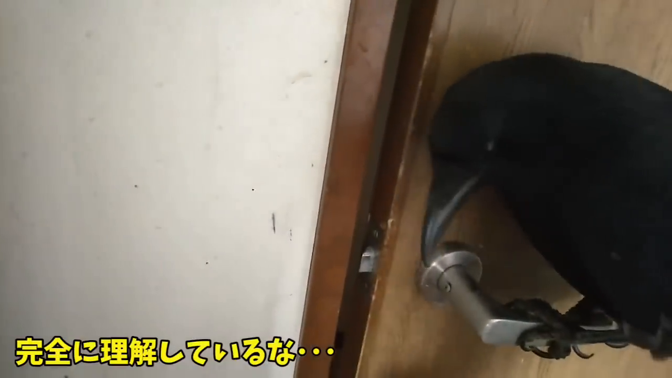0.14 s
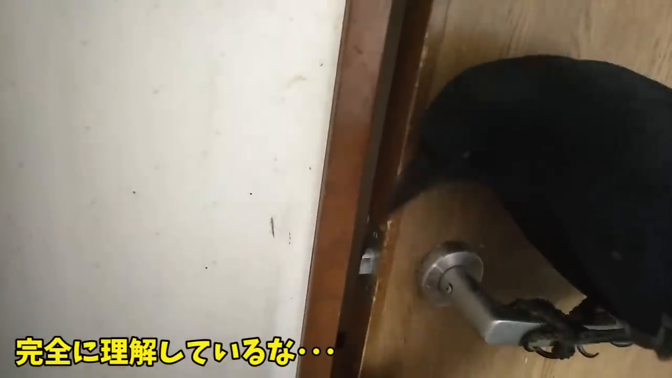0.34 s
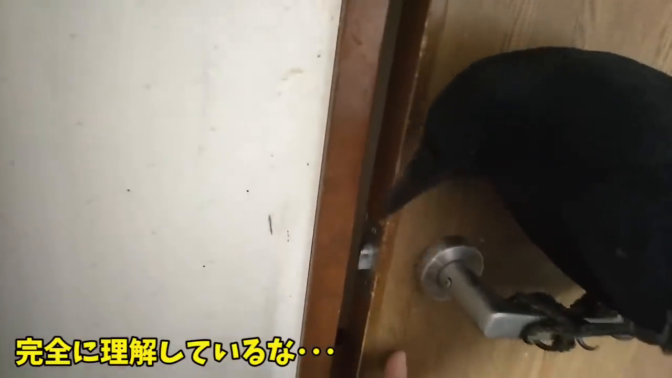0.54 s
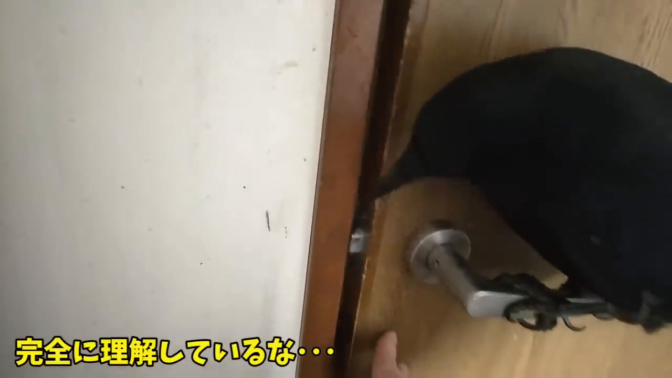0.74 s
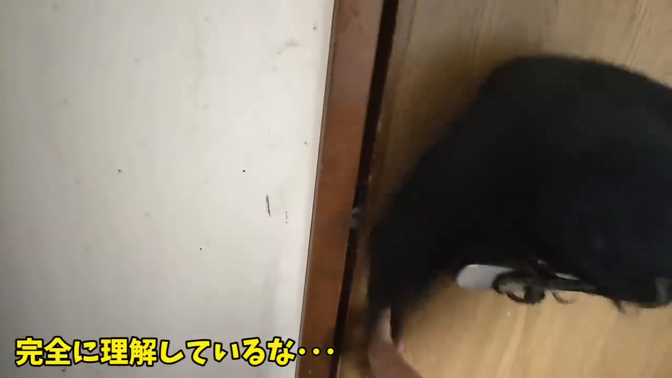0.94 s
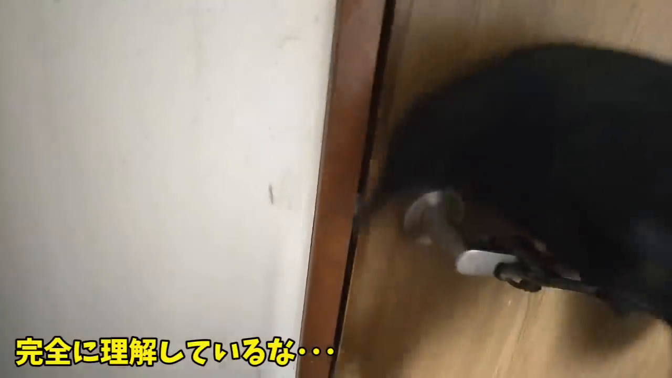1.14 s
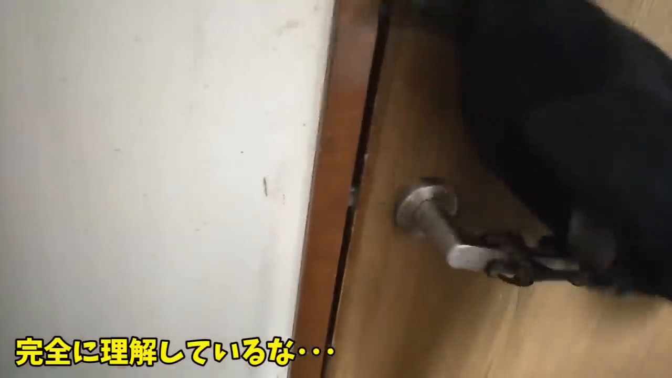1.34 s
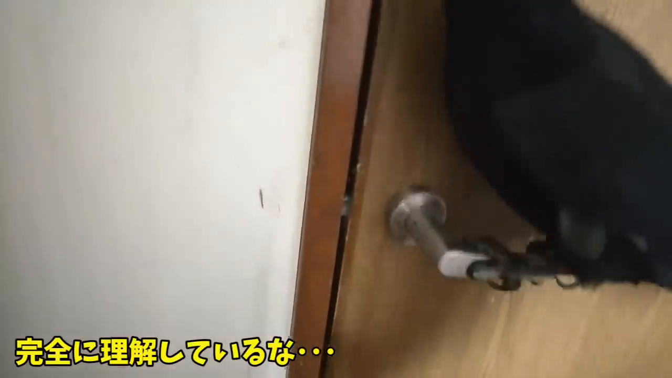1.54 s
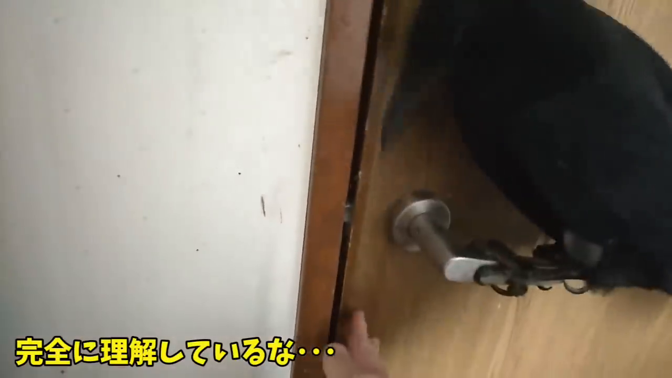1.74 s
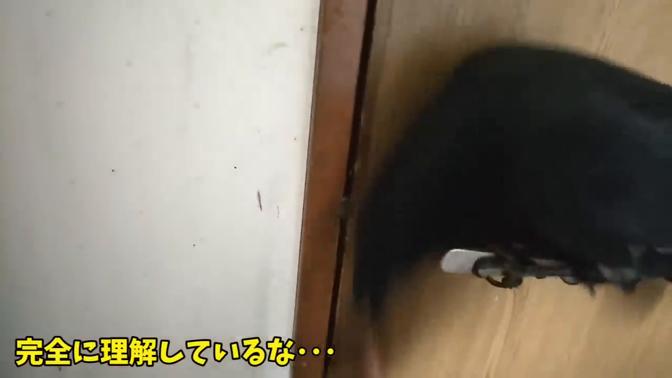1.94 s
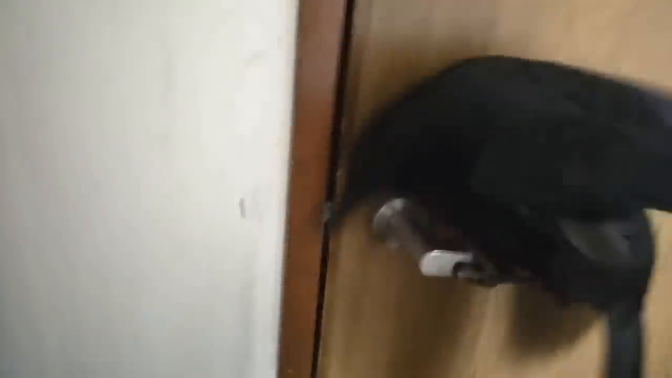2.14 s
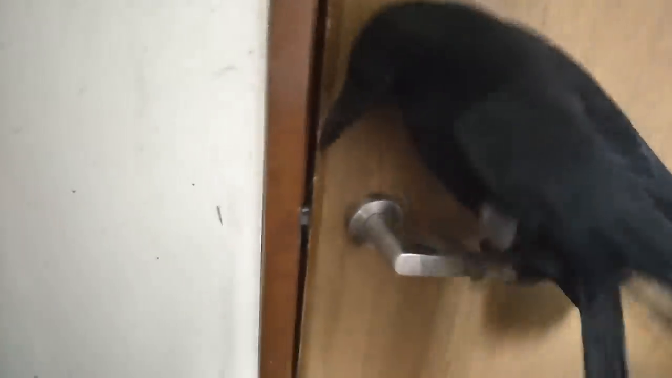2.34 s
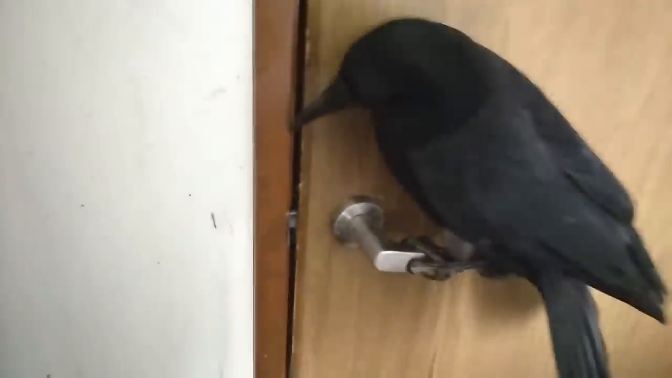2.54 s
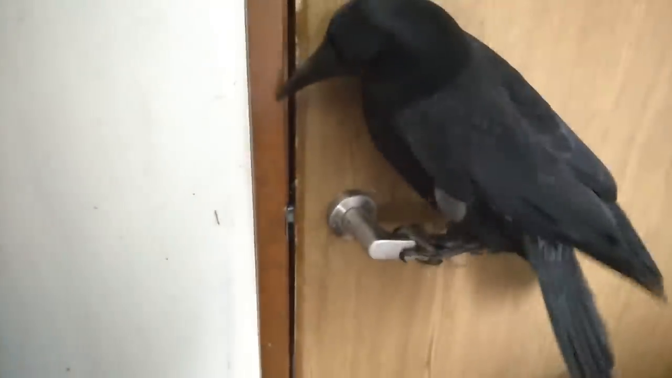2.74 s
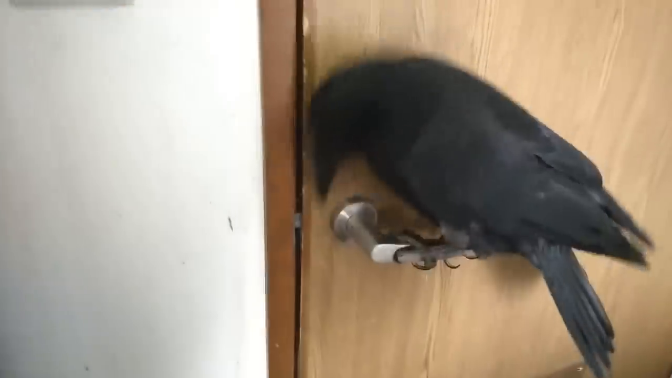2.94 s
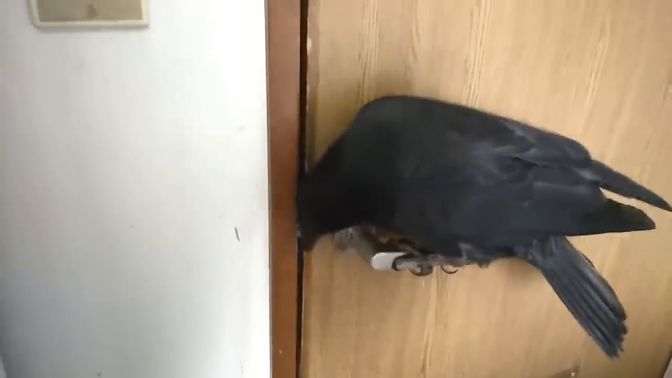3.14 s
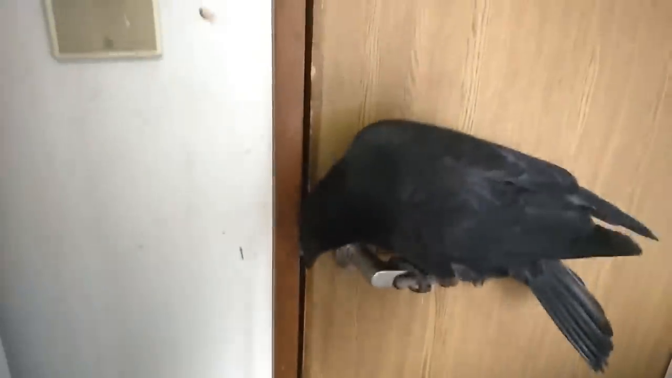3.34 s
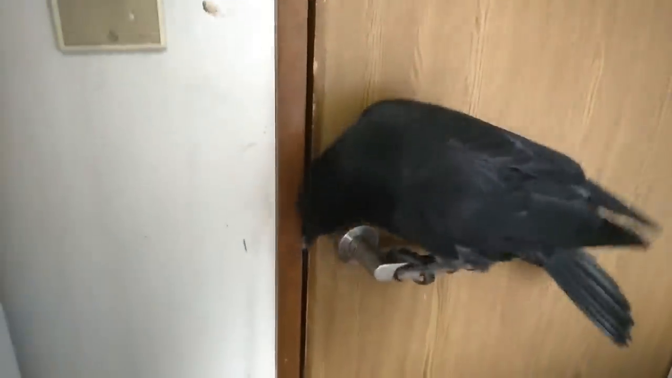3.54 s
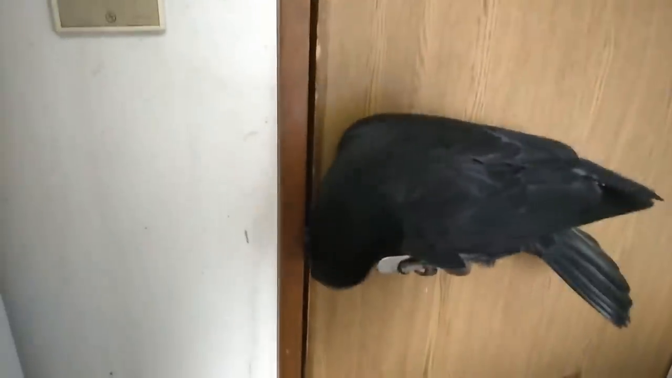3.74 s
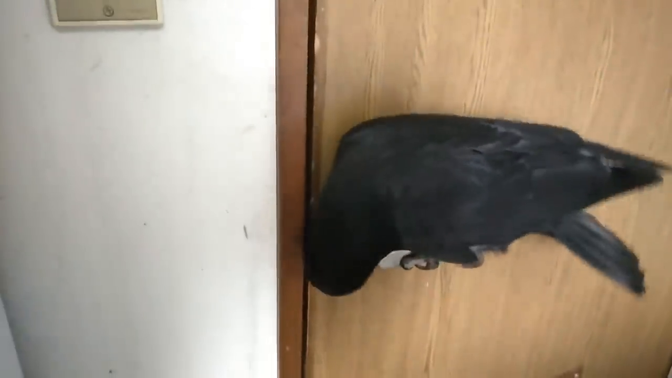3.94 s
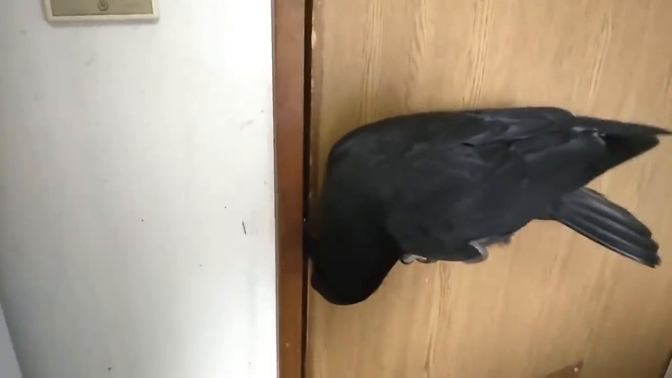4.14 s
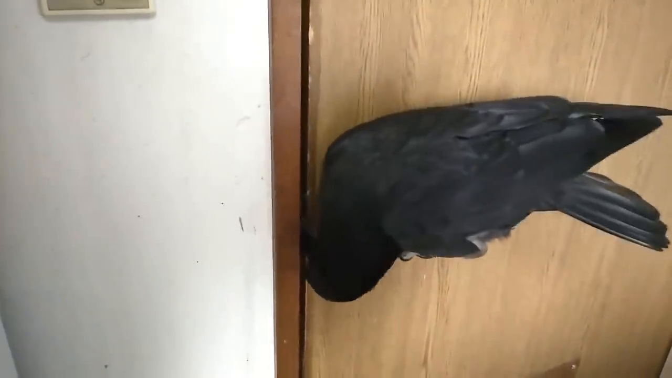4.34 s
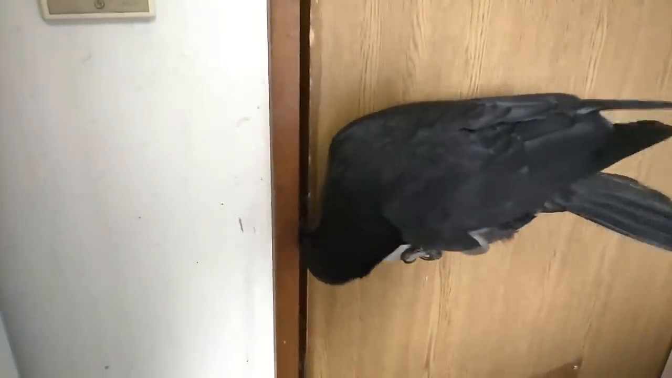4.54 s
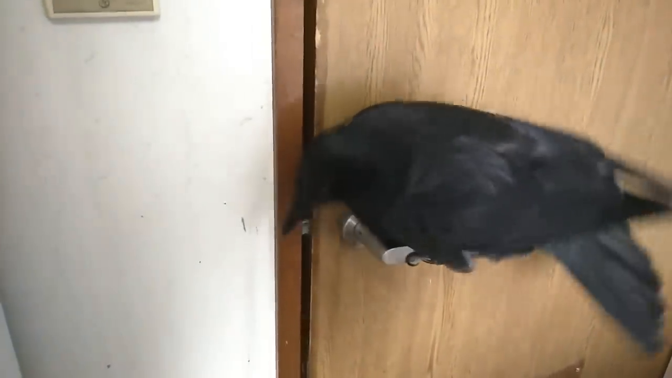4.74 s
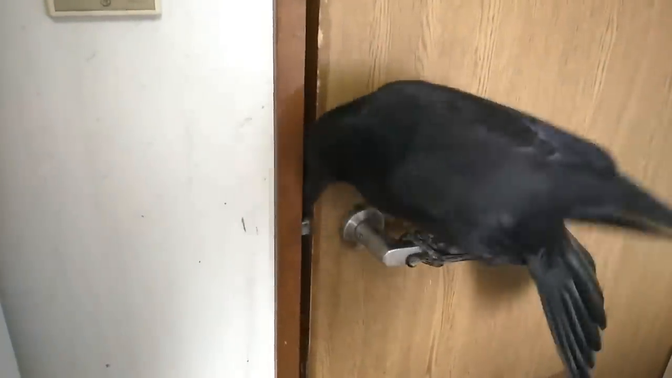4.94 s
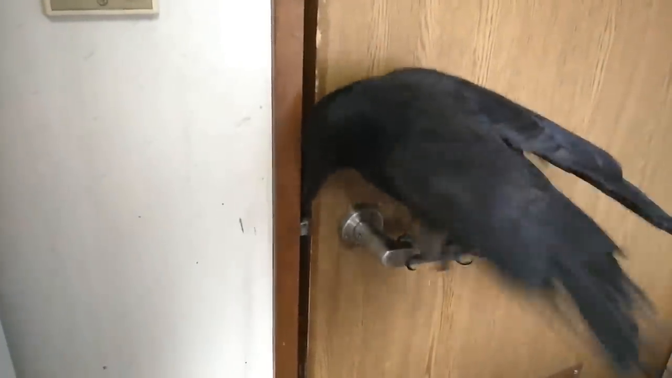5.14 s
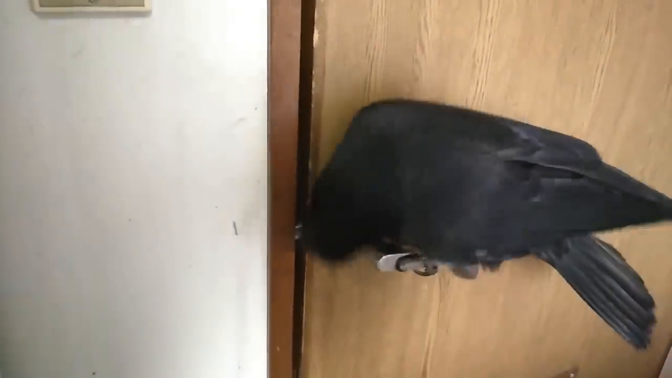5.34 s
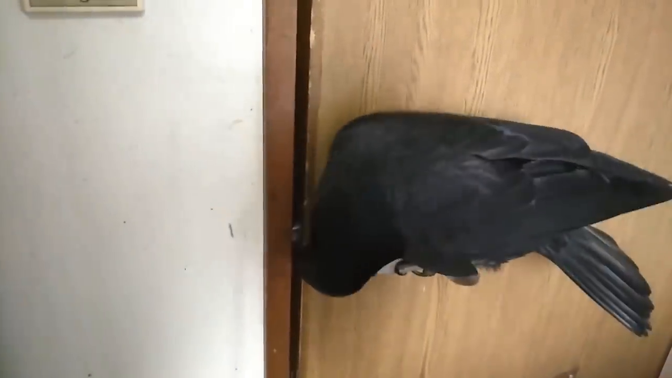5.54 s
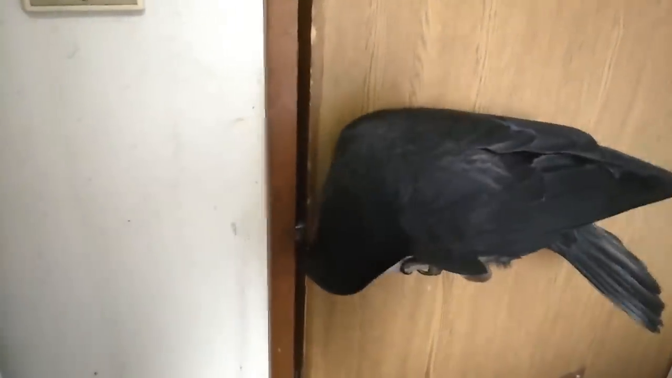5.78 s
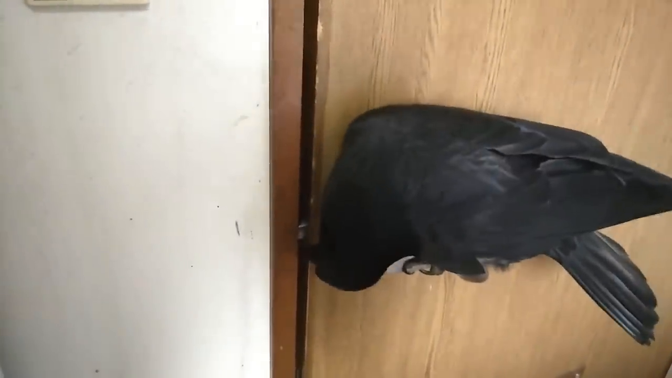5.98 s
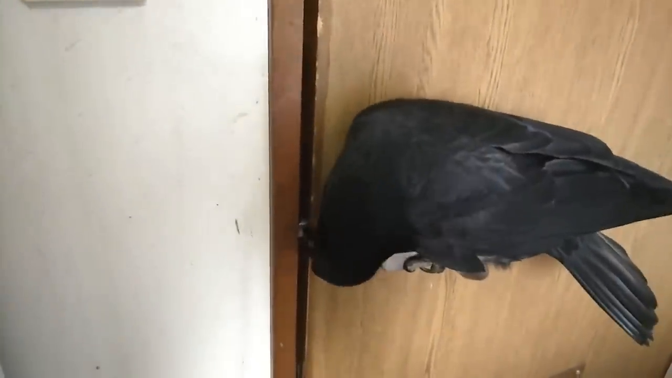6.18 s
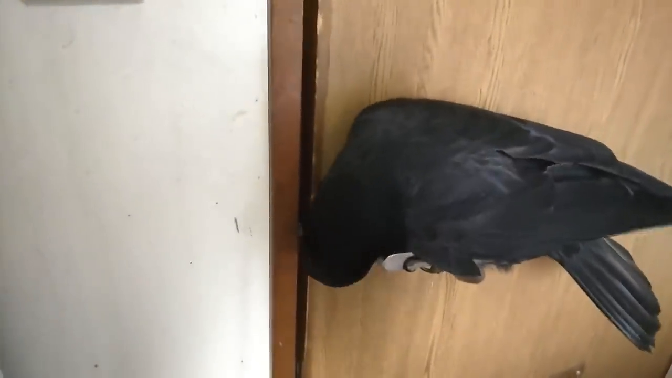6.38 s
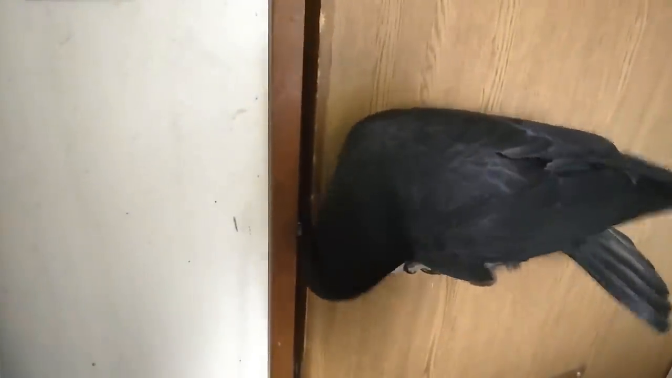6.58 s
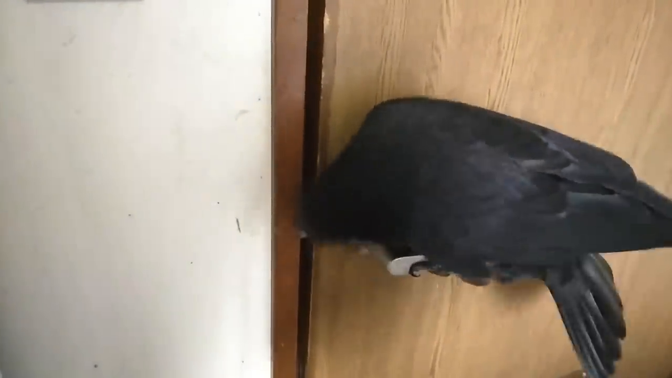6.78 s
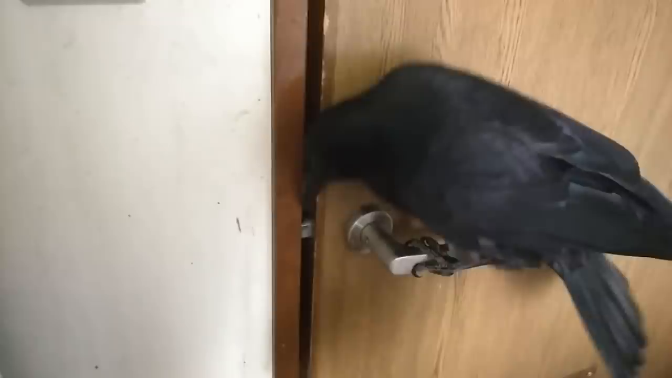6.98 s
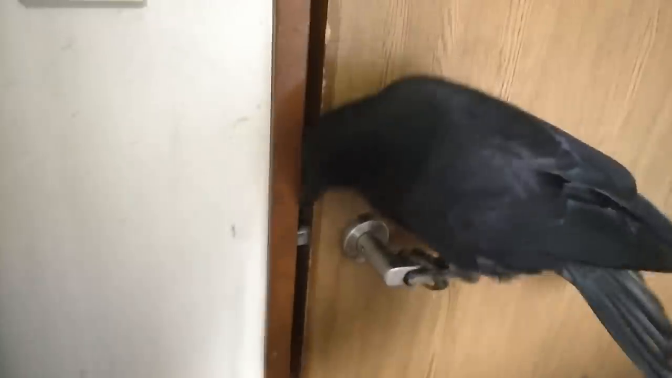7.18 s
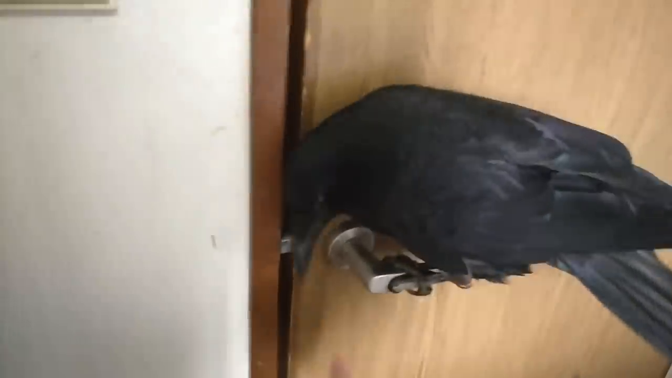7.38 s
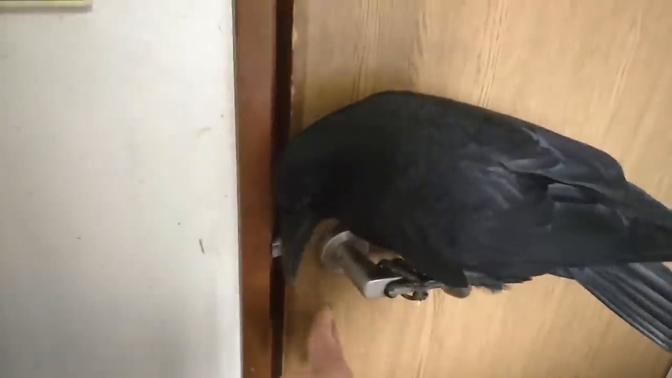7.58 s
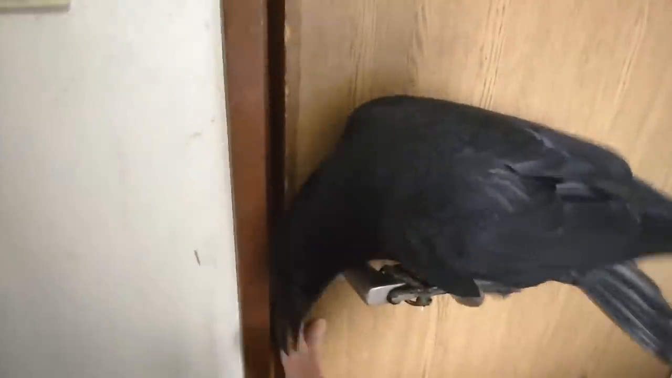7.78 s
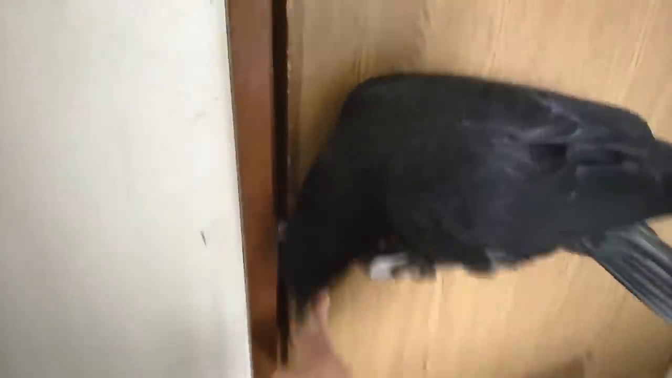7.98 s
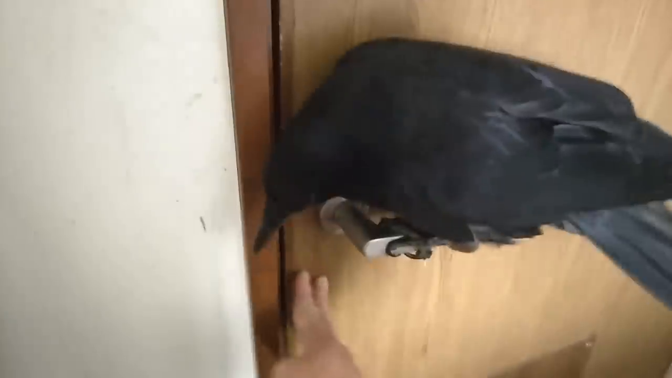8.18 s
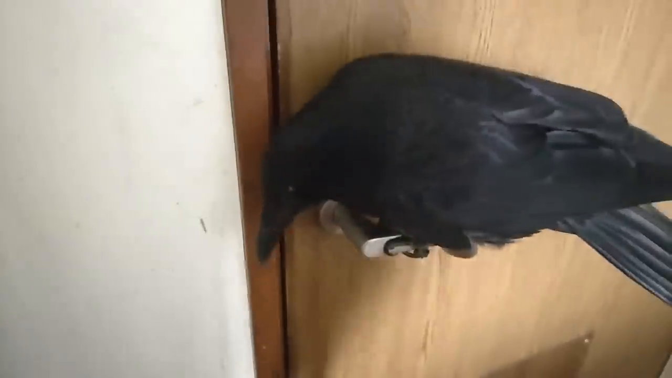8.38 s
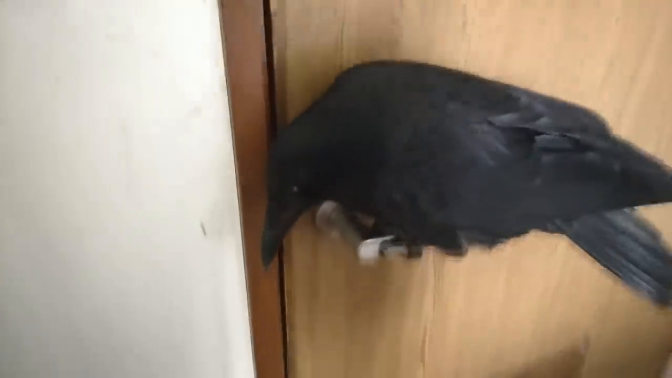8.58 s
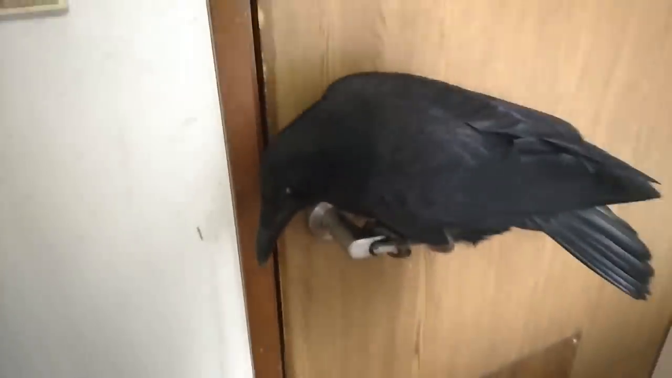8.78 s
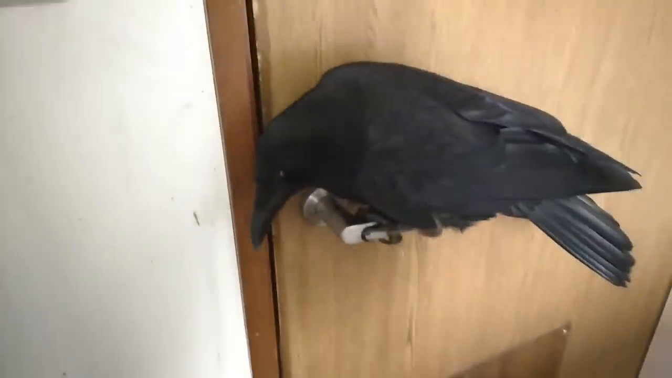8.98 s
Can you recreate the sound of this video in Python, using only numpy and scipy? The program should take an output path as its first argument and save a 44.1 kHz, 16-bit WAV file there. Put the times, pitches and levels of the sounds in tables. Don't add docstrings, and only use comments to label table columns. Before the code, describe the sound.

A large black bird perched on a metal door handle tugs and pecks at the latch. Early dull door jolts and wing rustles lead to a bright metallic peck, then isolated hard clacks and hollow knocks. A late cluster of deep thuds is loudest. Bare walls ring briefly after each blow; the close stereo pickup hisses softly.

```python
import sys
import numpy as np
from scipy import signal
from scipy.fft import rfft, irfft
from scipy.io import wavfile
from scipy.ndimage import uniform_filter1d

SR = 44100
rng = np.random.default_rng(int(sys.argv[2]) if len(sys.argv) > 2 else 0)


def pcm_store(signal):
    levels = np.round(np.clip(np.atleast_2d(signal), -1, 1) * 32767)
    wavfile.write(sys.argv[1], SR, levels.astype(np.int16).T)


def invert_db(x):
    u = np.asarray(x, float) / 20
    return 10 ** u


N = 397723
TIME = np.arange(N) / SR


def unit(x):
    return x / np.sqrt(np.mean(x ** 2) + 1e-30)


def low_pass(x, order, hz):
    return signal.sosfilt(signal.butter(order, hz, fs=SR, output="sos"), x)


def high_pass(x, order, hz):
    return signal.sosfilt(signal.butter(order, hz, "high", fs=SR, output="sos"), x)


def ring(x, modes):
    total = 0
    for k, (hz, width, db) in enumerate(modes):
        resonance = signal.iirpeak(hz, hz / max(width, 2.5), SR)
        total = total + (-1) ** k * invert_db(db) * signal.lfilter(*resonance, x)
    return total


def colour(x, shape):
    hz, db = np.transpose(shape)
    size = 4096
    bins_hz = np.arange(size // 2 + 1) * SR / size
    curve_db = np.interp(np.log(bins_hz + 1), np.log(hz), db)
    cepstrum = irfft(curve_db * np.log(10) / 20)
    cepstrum[1:size // 2] *= 2
    cepstrum[size // 2 + 1:] = 0
    response = irfft(np.exp(rfft(cepstrum)))
    return signal.fftconvolve(x, response)[:len(x)]


def grains(rate, scatter_db):
    clicks = (rng.random(N) < rate / SR) * rng.standard_normal(N)
    accents = np.minimum(rng.exponential(size=N), 4)
    return unit(clicks * invert_db(scatter_db * accents))


def flutter(rate):
    k = int(SR / rate)
    steps = np.repeat(rng.standard_normal(N // k + 1), k)
    return uniform_filter1d(steps, k)[:N]


def held(times, values):
    return np.r_[0, values][np.searchsorted(times, TIME + 2 / SR)]


def swells(start, hold, db, rise, fade_db_s, rest_db):
    power = np.full(N, invert_db(2 * rest_db))
    for s, length, level_db in zip(start, hold, db):
        span = slice(int(s * SR), int(s * SR) + SR)
        t = np.maximum(TIME[span] - s, 0)
        fade_db = fade_db_s * np.maximum(t - rise - length, 0)
        gain = np.minimum(t / rise, 1) ** 2 * invert_db(level_db - fade_db)
        power[span] += gain ** 2
    return np.sqrt(power)


def struck(times, db, hz, t60, rise=1e-5):
    t = TIME[:SR // 4]
    out = np.zeros(N + SR // 4)
    for s, level_db, f, decay, soft in zip(times, db, hz, t60, rise * np.ones(len(times))):
        start = int(s * SR)
        envelope = 1000. ** (-t / max(decay, .002)) * (1 - np.exp(-t / soft))
        out[start:start + len(t)] += invert_db(level_db) * np.sin(2 * np.pi * f * t) * envelope
    return out[:N]


def blows(times, levels_db, chatter_ms, chatter, slow=0):
    grind_swell = 3.72
    t = TIME[:SR // 20] * 1000 / chatter_ms
    force = np.zeros((len(levels_db), N + len(t)))
    roughness = rng.standard_normal((len(times), len(t)))
    grinds = slow * np.ones(len(times))
    for s, db, grind, rough in zip(times, np.transpose(levels_db), grinds, roughness):
        burst = chatter * rough * np.exp(-t) * (1 + grind * (grind_swell * t - 1))
        burst[0] = 1 - grind
        start = int(s * SR)
        force[:, start:start + len(t)] += invert_db(db)[:, None] * burst
    return force[:, :N]


def place(x, pan_db, lag_ms):
    late = np.interp(TIME - lag_ms / 1000, TIME, x)
    return np.array([x * invert_db(pan_db / 2), late * invert_db(-pan_db / 2)])


def room(x):
    # frequency [Hz], time to fall 60 dB [s]
    decay_table = [(200, 0.61), (700, 0.37), (2500, 0.39), (7000, 0.39), (14000, 0.26)]
    room_db, wall_gap_ms, turns_per_s = 9, 1, 0.23
    early_db, early_ms = -1, 14
    t = TIME[:SR // 2]
    decay_hz, decay_s = np.transpose(decay_table)
    tail = 0
    for hz in 90 * 2 ** np.arange(8.):
        band = signal.butter(2, [hz / 2 ** .5, hz * 2 ** .5], "band", fs=SR, output="sos")
        mid, side = signal.sosfilt(band, rng.standard_normal((2, 2, 1, len(t))))
        t60 = np.interp(np.log(hz), np.log(decay_hz), decay_s)
        spread = min(hz / 600., 1) * side * np.array([[1], [-1]])
        tail = tail + (mid + spread) * 1000. ** (-t / t60)
    tail = tail * np.clip(t * 1000 / wall_gap_ms, 0, 1)
    tail = tail * (1 + invert_db(early_db) * np.exp(-t * 1000 / early_ms))
    tail = tail / np.sqrt(np.sum(tail ** 2) / 4)
    turn = 2 * np.pi * turns_per_s * TIME
    echoes = 0
    for share, path in zip((np.cos(turn), np.sin(turn)), tail):
        echoes = echoes + signal.oaconvolve((x * share)[None], path, axes=1)[:, :N]
    return invert_db(room_db) * echoes


def hiss():
    # frequency [Hz], density [dB per Hz]
    hiss_shape = [(21, -5), (35, -11), (132, 3), (225, -5), (783, -11.5), (889, -11.5), (1640, -13.5),
                  (7750, -17.5), (9260, -19), (10000, -23), (11100, -26), (13200, -24.5), (15400, -85)]
    hiss_db = -57.5
    left, right, shared = (colour(v, hiss_shape) for v in rng.standard_normal((3, N)))
    ports = np.array([left, right])
    ports = ports + 0.57 * low_pass(shared - ports, 2, 420)
    return unit(ports) * invert_db(hiss_db + 5.5 + 1.0 * flutter(3.8))


def creak():
    # start [s], held [s], level [dB], pitch [Hz]
    creak_table = [
        (0.115, 0.044, -53.5, 240),
        (0.36, 0.12, -54, 244.4),
        (0.655, 0.026, -53, 239),
        (3.78, .16, -57, 252.4),
    ]
    s, hold, db, pitch_hz = np.transpose(creak_table)
    hz = held(s, pitch_hz) * (1 + 0.016 * flutter(40))
    gain = swells(s, hold, db, rise=0.02, fade_db_s=500, rest_db=-107) * invert_db(3.63 * flutter(28.3))
    return np.sqrt(2) * np.sin(2 * np.pi * np.cumsum(hz) / SR) * gain


def sway():
    # start [s], held [s], leaf level [dB], panel over leaf [dB]
    tug_table = [(0.38, 0.067, -70, -8), (0.63, 0.13, -61, 3), (1.33, .03, -44, 1.5),
                 (1.44, 0.059, -43, -27.5), (1.59, 0.022, -40.5, 0.5), (1.865, 0.044, -51.5, 3),
                 (2.49, .03, -53, 6.5), (2.78, .04, -64.5, 7), (2.12, 0.15, -45.5, -3),
                 (2.535, 0.038, -46.5, 1.5), (2.839, 0.038, -47.5, 5.5), (2.93, 0.12, -51.5, -2),
                 (3.3, 0.054, -66, 9), (3.595, 0.033, -51.5, 8.5), (3.64, 0.045, -45, -3.5),
                 (4.21, 0.032, -47, -5), (4.40, 0.038, -53, 5.5), (4.688, 0.14, -49, 3.5),
                 (5.072, 0.044, -50.5, 7.5), (5.17, 0.037, -48.5, 12), (5.328, 0.043, -44, -1),
                 (5.73, .05, -56, 6.5), (6.04, 0.059, -56, -14), (6.36, 0.16, -55, 0),
                 (7.24, 0.079, -46.5, 4), (7.468, 0.021, -48, 4), (7.89, 0.15, -46.5, -9),
                 (8.77, 0.011, -62.5, 13), (8.88, .12, -51, -21), (7.15, 0.045, -56.5, 6)]
    # start [s], held [s], leaf level [dB], panel over leaf [dB]
    shove_table = [(0.927, 0.13, -31, -1), (1.14, 0.016, -23.5, -8.5), (1.19, 0.05, -32, 3.5),
                   (1.922, 0.13, -37.5, 4), (3.98, 0.066, -40.5, 3), (4.135, 0.023, -40, 12),
                   (4.77, 0.067, -56, 23.5), (6.67, 0.023, -46, 11.5), (6.74, 0.069, -42, 7),
                   (8.036, 0.075, -28.5, -10), (8.12, 0.049, -25.5, -0.5), (8.201, 0.034, -15.5, -4.5),
                   (8.319, 0.08, -39.5, 15.5), (8.52, 0.025, -34, -17.5), (8.639, 0.11, -45, -12.5)]
    # frequency [Hz], width [Hz], level [dB]
    leaf_modes = [(48.8, 15.3, 0.5), (70, 32, -7.5), (84, 4.5, -14.5), (110, 25, -7)]
    # frequency [Hz], width [Hz], level [dB]
    panel_modes = [(143, 29, -2), (168.5, 16.8, 3.5), (216, 15.5, 2.5), (299.6, 55, -5.5),
                   (340.4, 39, -2.5), (390.6, 44.6, -3), (436, 63, -5), (627, 510, -13)]
    rise_s = 0.011
    s, hold, db, panel_db = np.transpose([*tug_table, *shove_table])
    leaf = unit(ring(ring(grains(500, 1.2), leaf_modes), [(70, 137, 0)])) * invert_db(0.86 * flutter(13))
    panel = unit(ring(ring(grains(700, 1.18), panel_modes), [(240, 770, 0)])) * invert_db(3.25 * flutter(37))
    leaf_gain = swells(s, hold, db, rise_s, fade_db_s=133, rest_db=-67.5)
    panel_gain = swells(s, hold, db + panel_db, rise_s, fade_db_s=170.5, rest_db=-64.5)
    return leaf * leaf_gain + panel * panel_gain


def thuds():
    # time [s], peak [dB], pitch [Hz], time to fall 60 dB [s]
    thud_table = [(0.936, -18, 98, 0.12), (1.145, -18.5, 107, 0.075), (1.199, -16.5, 374, 0.3),
                  (1.596, -26, 157, 0.15), (1.928, -17.5, 53, 0.22), (1.963, -15.5, 373, 0.14),
                  (2.548, -30, 172, 0.13), (2.846, -32.5, 162, 0.13), (3.643, -34, 143, 0.1),
                  (3.985, -27.5, 116.5, 0.41), (5.176, -20, 198, 0.037), (5.735, -31, 116, 0.12),
                  (6.361, -45.5, 121, 0.12), (7.889, -47, 124, 0.12), (8.059, -15.5, 103, 0.3),
                  (8.211, 0.5, 70.0, 0.14), (8.322, -3, 361, 0.085)]
    return invert_db(-4.0) * struck(*np.transpose(thud_table), rise=0.0015)


def rustle():
    # start [s], held [s], level [dB], scuff over feathers [dB]
    shift_table = [(0.62, .12, -66, 0), (1.119, 0.33, -49.5, -7.5), (1.325, 0.011, -35.5, -15),
                   (1.47, 0.11, -60, -5), (1.62, 0.11, -59, -10), (1.93, .12, -62, 12),
                   (0.96, .12, -62, 12), (1.97, 0.14, -48, -10), (2.149, 0.022, -48, -13),
                   (2.315, 0.0079, -37, -14), (2.46, 0.13, -49, -9), (2.82, 0.17, -55, -10),
                   (3.06, 0.14, -52, -11), (3.26, 0.069, -63, -3), (3.468, 0.17, -48, -12),
                   (3.6, 0.021, -54, -5), (3.70, 0.13, -54.5, -21), (4.529, 0.069, -61.5, 3),
                   (5.069, 0.068, -53.5, -7), (5.162, 0.0089, -35, -14), (5.3, 0.24, -54, -16),
                   (6.03, 0.04, -71, -13), (6.99, 0.29, -53, -9), (7.177, 0.0055, -44, -10),
                   (7.4, 0.02, -54, -24.5), (7.46, 0.14, -60.5, -29), (7.62, 0.22, -60, -1.5),
                   (7.814, 0.11, -56, -6.5), (7.92, 0.097, -57.5, -8), (8.11, .07, -58.5, 10),
                   (8.627, 0.022, -54, -13), (8.76, .04, -77, -10)]
    # frequency [Hz], density [dB per Hz]
    feather_shape = [(880, -45), (1500, -25), (2690, -7), (3500, -7), (8510, -0.5), (10000, 0.5),
                     (11200, -4), (13500, -13.5), (14500, -14.5), (15400, -69.5)]
    s, hold, db, scuff_db = np.transpose(shift_table)
    vanes = unit(colour(grains(5000, 2.3), feather_shape))
    coarse = low_pass(vanes, 2, 5500)
    fine = vanes - coarse
    vanes = coarse * invert_db(3.3 * flutter(45)) + fine * invert_db(2.2 * flutter(35))
    vanes = vanes * invert_db(1.5 * flutter(22))
    scuff = unit(ring(grains(3000, 2.5), [(926, 290, 3.5), (2150, 910, 1.04)])) * invert_db(2.7 * flutter(25))

    def effort(level_db):
        return swells(s, hold, level_db, rise=0.035, fade_db_s=265, rest_db=-82)

    return vanes * effort(db) + scuff * effort(db + scuff_db)


def pings():
    # time [s], peak [dB], pitch [Hz], lever ring [dB], left minus right [dB]
    ping_table = [(1.5015, -34.5, 8750, -17, 22), (1.573, -16.5, 9880, -14, 11),
                  (2.5024, -31.5, 12300, -10, 6.5), (2.8205, -34.5, 6470, -12, 7),
                  (2.99, -17.5, 7600, -17, 10), (3.615, -25, 10930, -12, 12), (4.0005, -28, 9000, -25, 3),
                  (4.016, -31, 11500, -25, 4), (5.3235, -25.5, 11140, -21.5, 8), (7.2433, -20, 7510, 3, 8),
                  (7.2485, -21, 12600, -12, -19)]
    # frequency [Hz], level [dB], time to fall 60 dB [s]
    lever_notes = [(6110, -23, 0.31), (6500, -13, 0.24), (6928, -18, 0.44), (7560, 4.5, 0.18),
                   (7628, -25, 0.41), (10000, -26, 0.28), (11050, -33, 0.77)]
    edge_shape = [(500, -16), (2500, -13.5), (5000, -2.5), (9000, 10), (14000, 1), (16000, -40)]  # (Hz, dB)
    s, db, hz, ring_db, pan_db = np.transpose(ping_table)
    tick, lever = blows(s, [db, db + ring_db], chatter_ms=4.5, chatter=0.12)
    modes = [(f, np.log(1000) / (np.pi * decay), gain_db) for f, gain_db, decay in lever_notes]
    metal = invert_db(28.5) * ring(lever, modes)
    edge = invert_db(5.0) * colour(tick, edge_shape)
    note = struck(s, db - 6.5, hz, np.full(len(s), 0.02))
    return metal + edge + note, held(s, pan_db)


def pecks():
    # time [s], peak [dB]
    peck_table = [
        (2.5445, -17),
        (2.5493, 3),
    ]
    # frequency [Hz], width [Hz], level [dB]
    plate_modes = [(1270, 190, 12), (1520, 160, 5), (2150, 400, -6), (2700, 500, 2), (4500, 780, 3),
                   (5800, 970, 1), (8600, 960, 5), (11500, 2000, -2)]
    s, db = np.transpose(peck_table)
    plate = ring(blows(s, [db], chatter_ms=1.5, chatter=0.04)[0], plate_modes)
    return signal.lfilter(*signal.iirnotch(3350, 5.0, SR), plate)


def clacks():
    # time [s], peak [dB], door skin [dB], snap [dB], knock pitch [Hz]
    clack_table = [(0.9278, -29, 1, 6.5, 1270), (0.9344, -23, -2.5, -2.5, 800), (0.9405, -26, -3, -3, 960),
                   (4.0934, -37, -11, 12, 790), (4.1374, -18.5, -6.5, 2.5, 700),
                   (4.141, -10.5, -10.5, -4.5, 1070), (4.7691, 1.5, -12.5, -7.5, 1220),
                   (5.7329, -34, -2, -5, 1260), (6.527, -40, -13, -8, 1010),
                   (6.6058, -26.5, -0.5, -5.5, 990), (6.357, -31, -3, -9, 1410),
                   (6.7314, -20, -13, -2, 1660), (6.7461, -2.5, -6.5, -4, 700),
                   (7.4824, -43, -10.5, 0, 930), (8.2117, -14.5, -15.5, -7, 963),
                   (8.2275, -30, -25, 4, 990), (8.2214, -12, -18, 7, 960)]
    # time [s], peak [dB], door skin [dB], knock pitch [Hz]
    bump_table = [
        (0.9474, -49, 8, 730),
        (1.1135, -59, 28, 1020),
        (1.1985, -34, 14.5, 620),
        (1.9619, -37.5, 17, 540),
        (4.72, -32, 1.5, 990),
        (5.1791, -39.5, 5.5, 645),
        (6.3899, -49, 18.5, 660),
        (8.0954, -48, 16, 622),
        (8.1309, -51, 22.5, 533),
        (8.2314, -24, 8, 595),
    ]
    # time [s], peak [dB], door skin [dB], snap [dB], knock pitch [Hz]
    tap_table = [
        (1.1469, -22.5, -12, -10, 2700),
        (8.7817, -42, -0.5, 0, 1980),
    ]
    # time [s], peak [dB], door skin [dB], snap [dB], knock pitch [Hz]
    rub_table = [(1.927, -31, -4, -15, 2100), (3.9853, -37.5, -2.5, 1, 544), (4.7015, -39, 5, -1.5, 970),
                 (6.676, -24, -1.5, -10.5, 1010), (8.1773, -42, 2, -15, 900), (8.2057, -27.5, 0, -16, 1100),
                 (8.321, -20, 7.5, -14.5, 1650), (1.095, -40, 2, -6, 2000), (4.0866, -38, -12, 12.5, 800),
                 (4.0415, -19, 0.5, -1, 990), (6.511, -42, -9.5, -6.5, 1020), (1.02, -44, 12, -15, 620),
                 (1.06, -44, 12, -15, 560)]
    # time
    # [s], peak [dB], pitch [Hz], time to fall 60 dB [s]
    part_table = [(0.939, -34, 2100, .015), (0.941, -34, 3600, .01), (1.15, -35, 2900, .02),
                  (1.2, -36, 1500, .015), (1.2, -39, 2150, .015), (4.0452, -32, 4500, .008),
                  (4.1444, -19, 4400, .005), (4.146, -22, 5300, .005), (5.178, -30, 12900, .015),
                  (5.179, -34, 14000, .01), (2.502, -40, 7500, .006), (8.324, -22, 1550, .02),
                  (7.2445, -30, 6500, .05), (6.36, -42, 700, .03), (4.144, -24.5, 2600, .01),
                  (4.7695, -10.5, 2320, 0.0067), (4.771, -20.5, 5800, 0.0089), (4.771, -15.5, 655, 0.025),
                  (5.733, -44, 4800, .01), (5.733, -44, 2000, 0.013), (6.357, -38, 4500, 0.0071),
                  (6.358, -38, 3600, 0.0089), (6.68, -33, 3500, 0.0086), (6.608, -32, 4500, .008),
                  (6.7465, -14, 2270, .01), (6.747, -11.5, 7240, 0.0086), (6.747, -12, 8600, .008),
                  (8.213, -22, 2700, 0.011), (8.222, -17, 8300, .008), (8.323, -20, 2200, 0.019)]
    # frequency [Hz], width [Hz], level [dB]
    skin_modes = [(561, 18, 0), (667.6, 20, 7), (775, 40, -4), (844, 17, -3), (1026.4, 38, 6),
                  (1210, 20, 2), (1315, 97, -10)]
    # frequency [Hz], width [Hz], level [dB]
    latch_modes = [(1610, 71, 6.5), (1850, 81, 11), (2200, 260, 4.5), (2536, 120, -5), (2860, 110, 3.5)]
    # frequency [Hz], density [dB per Hz]
    snap_shape = [(3000, 3.5), (4500, 4), (6300, 2.5), (8560, 5.5), (10100, -0.5), (13300, -7),
                  (14500, -42.5), (15400, -97.5)]

    bumps = [(s, db, skin_db, -19, hz) for s, db, skin_db, hz in bump_table]
    # its rows, the share that reaches the walls in dB, 1 where the contact is slow
    kinds = (clack_table, -1.5, 0), (bumps, -2.5, 1), (tap_table, -10.5, 0), (rub_table, -4, 1)
    contacts = sorted((*row, wall, slow) for rows, wall, slow in kinds for row in rows)
    s, db, skin_db, snap_db, hz, wall_db, slow = np.transpose(contacts)
    latch, skin, snap = blows(s, [db, db + skin_db, db + snap_db], chatter_ms=3.1, chatter=0.06, slow=slow)

    spot = struck(s, db + skin_db + 4.5, hz, np.full(len(s), 0.007), rise=1e-5 + 0.0018 * slow)
    spot = spot + invert_db(13.0) * ring(skin, [(887, 1000, 0.0024)])
    body = spot + invert_db(8.5) * ring(spot, skin_modes)
    case = invert_db(4.0) * ring(latch, latch_modes) + invert_db(20.5) * ring(latch, [(2100, 6800, 0.006)])
    case = low_pass(case, 5, 3300)
    bolt = invert_db(16.5) * high_pass(colour(snap, snap_shape), 5, 3600)
    parts = struck(*np.transpose(part_table))
    return high_pass(body + case + bolt + parts, 3, 380), held(s, wall_db)


def scene():
    door = sway() + creak() + thuds()
    soft = rustle()
    ping, ping_pan_db = pings()
    peck = pecks()
    knock, wall_db = clacks()

    direct = place(door, 0.13, 0.21)
    direct = direct + invert_db(4.0) * place(soft, -0.94, 5.3)
    direct = direct + place(ping, ping_pan_db, 0.265)
    direct = direct + place(peck, 0.4, 0.094)
    direct = direct + place(knock, -0.47, 0.405)

    to_walls = invert_db(-18.5) * door + invert_db(-9.5) * soft + invert_db(-7) * ping + invert_db(-6) * peck + invert_db(wall_db) * knock
    heard = direct + room(to_walls)
    heard[1] = colour(heard[1], [(100, -1.0), (9500, 1.5), (11000, -4.5), (14000, -25)])
    return heard + hiss()


def top_cut(x):
    return signal.sosfilt(signal.butter(12, 15570, fs=SR, output="sos"), x)


def record(dry):
    x = high_pass(dry, 5, 44)
    x = x - 0.24 * ring(x, [(3380, 286, 0)])
    x = signal.lfilter(*signal.iirnotch(10100, 10.0, SR), x)
    x = np.tanh(0.82 * x) / 1.05
    x = low_pass(x, 8, 15000)
    return top_cut(x)


dry = scene()
out = record(dry)
pcm_store(out)
```